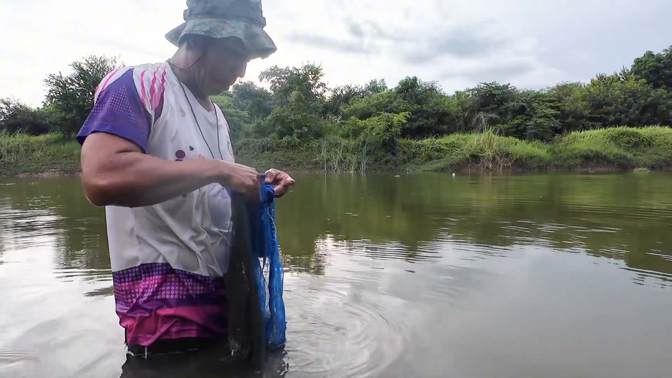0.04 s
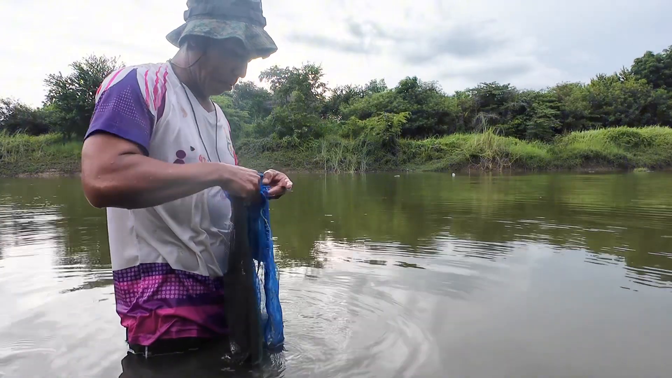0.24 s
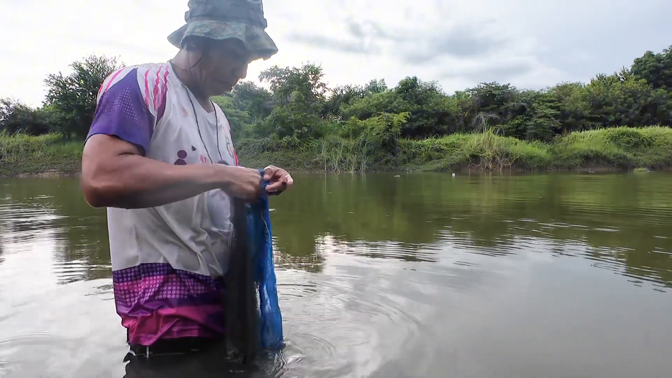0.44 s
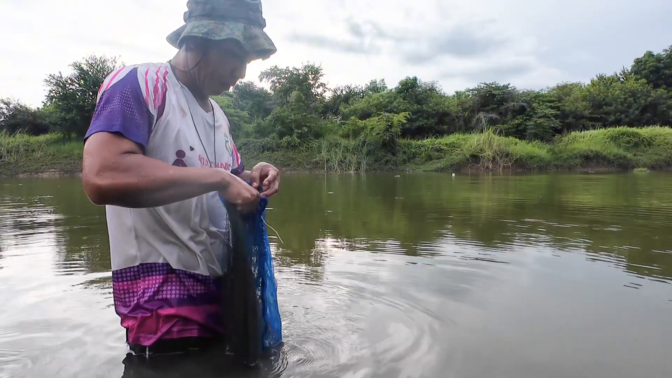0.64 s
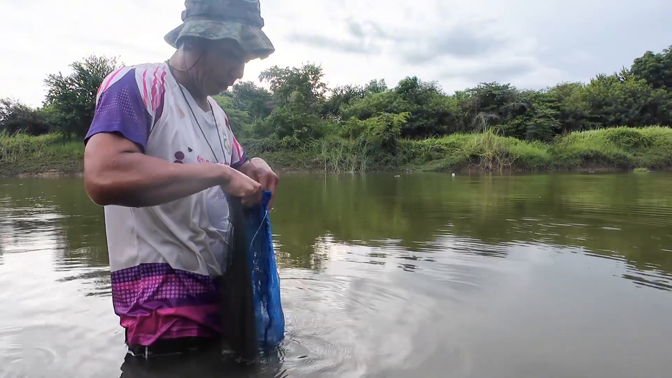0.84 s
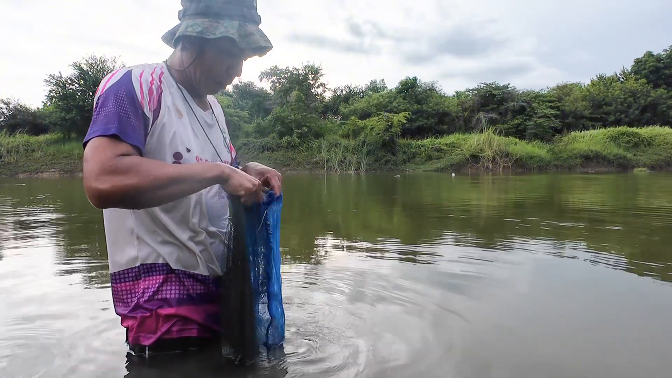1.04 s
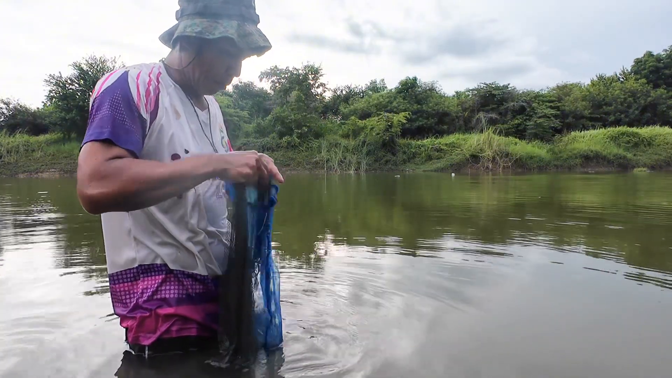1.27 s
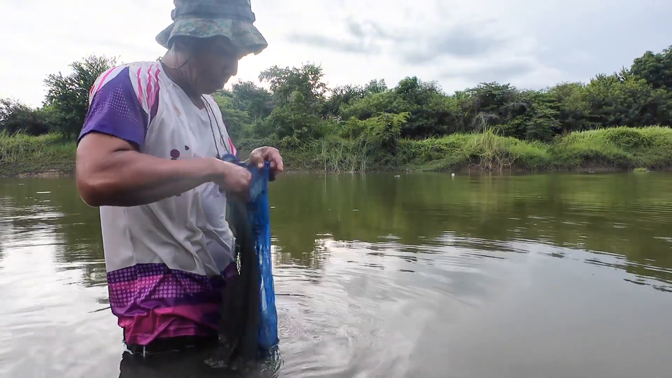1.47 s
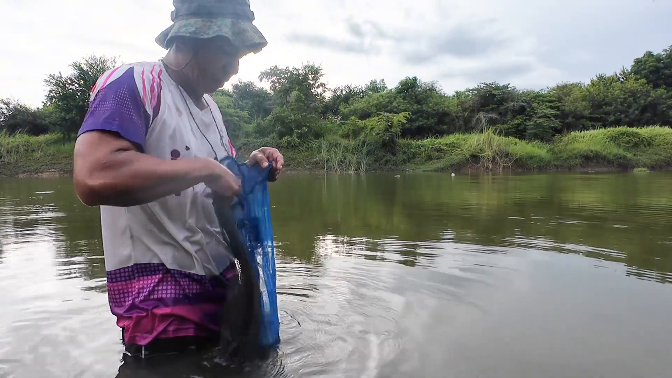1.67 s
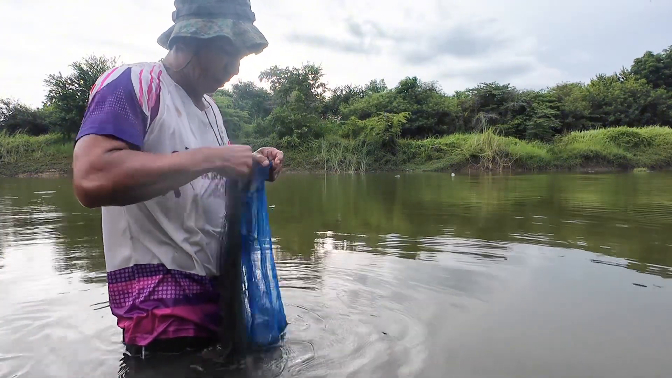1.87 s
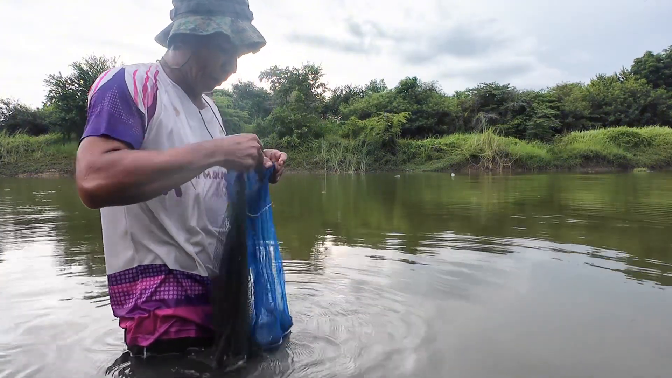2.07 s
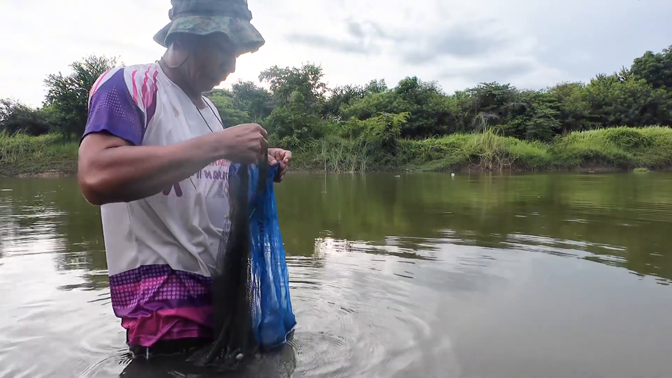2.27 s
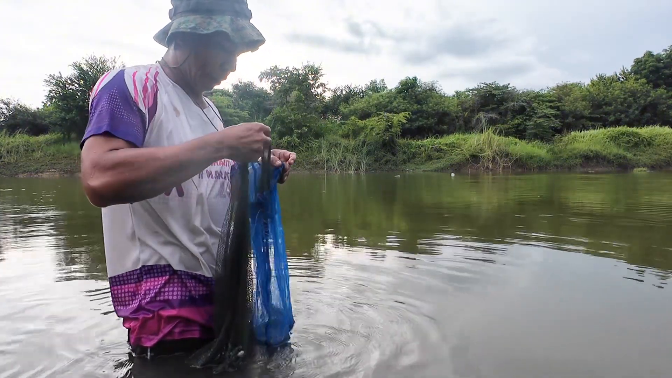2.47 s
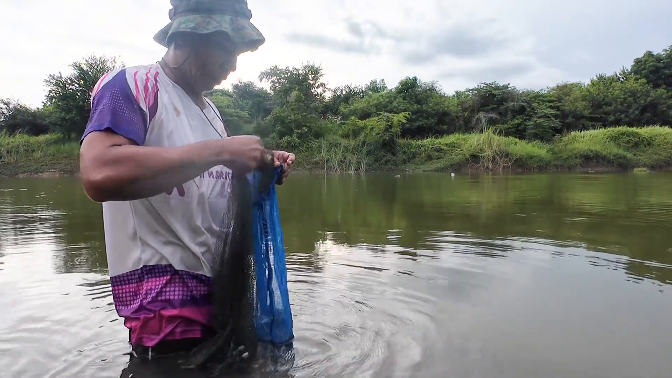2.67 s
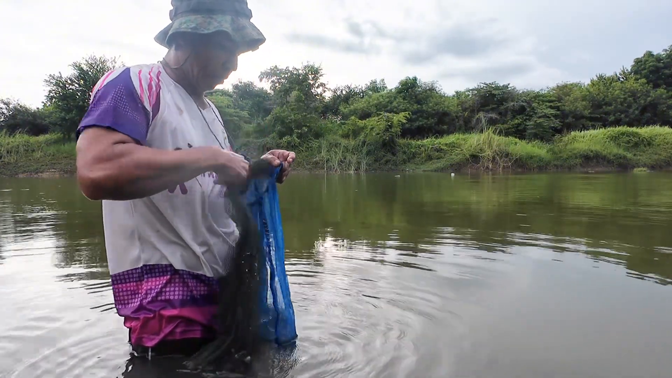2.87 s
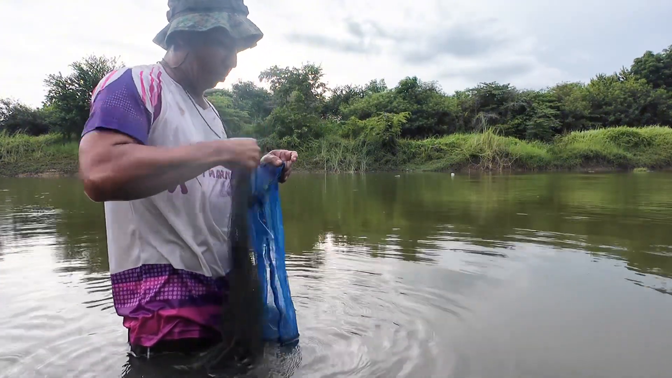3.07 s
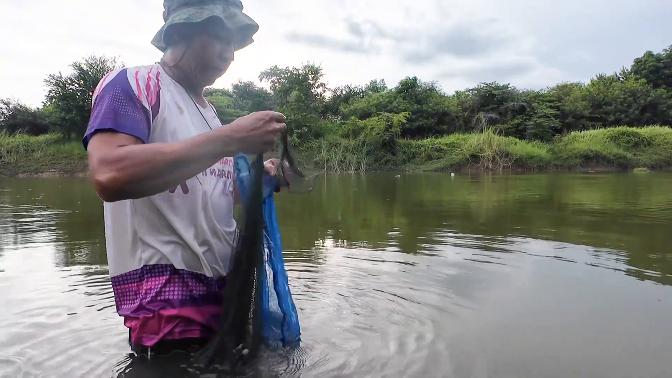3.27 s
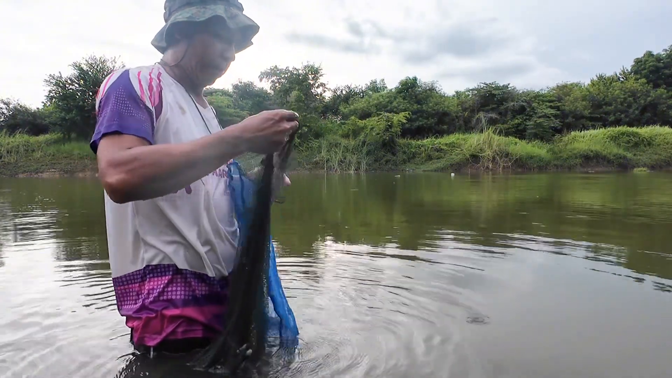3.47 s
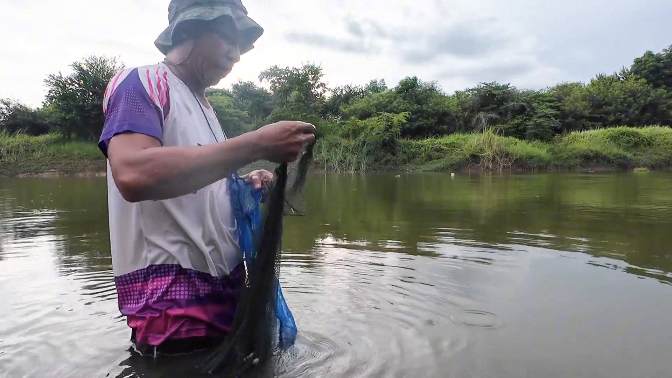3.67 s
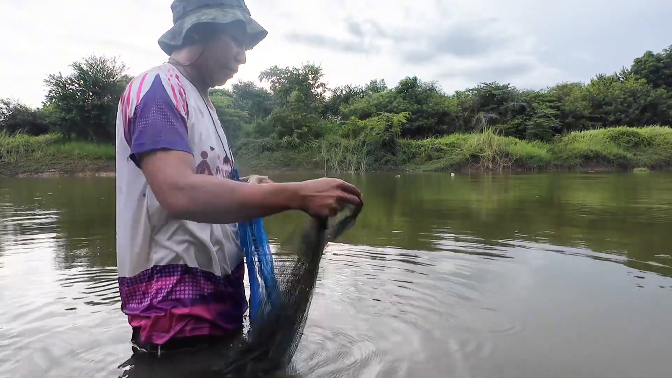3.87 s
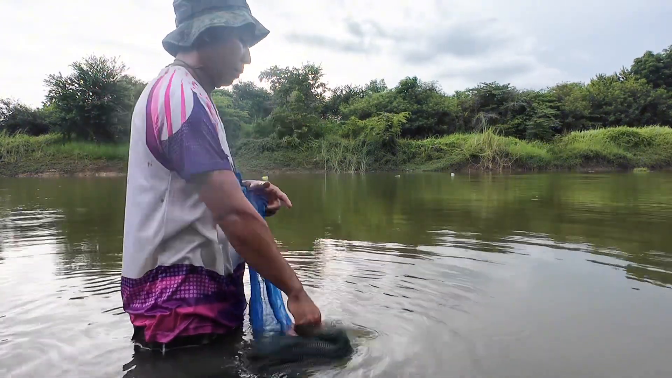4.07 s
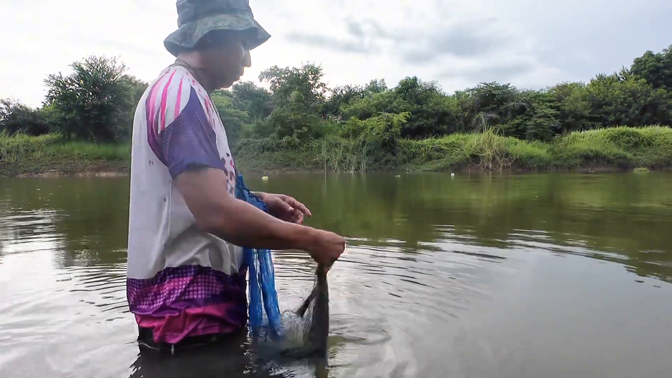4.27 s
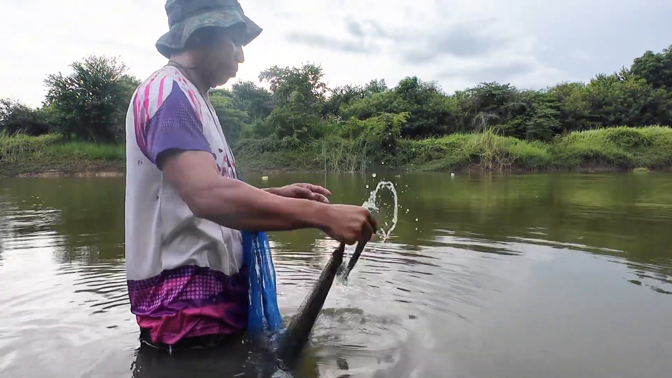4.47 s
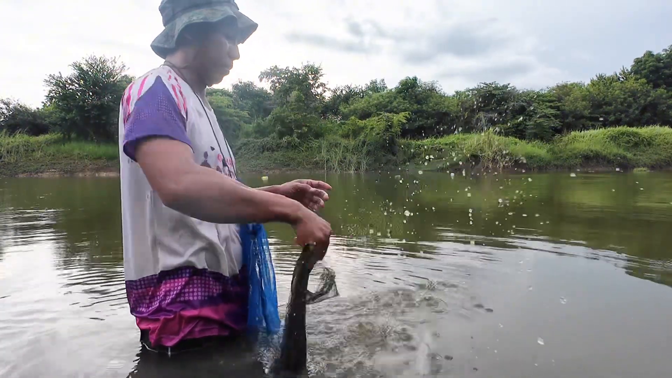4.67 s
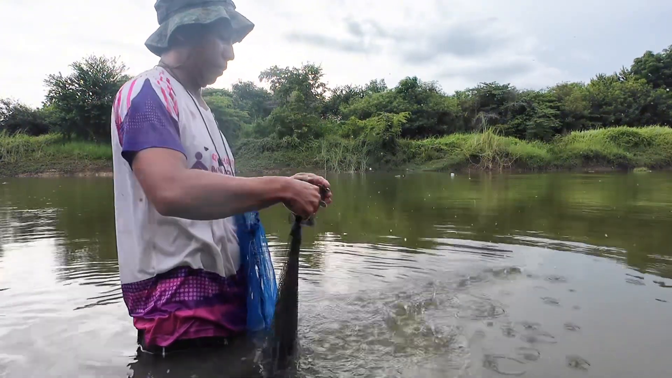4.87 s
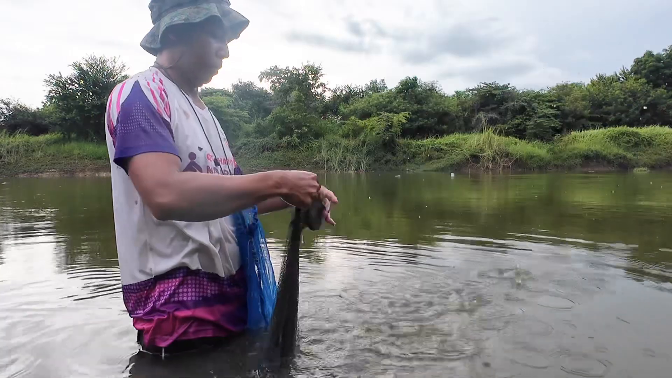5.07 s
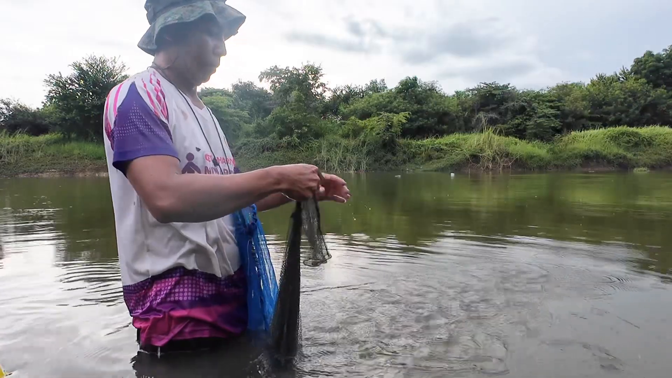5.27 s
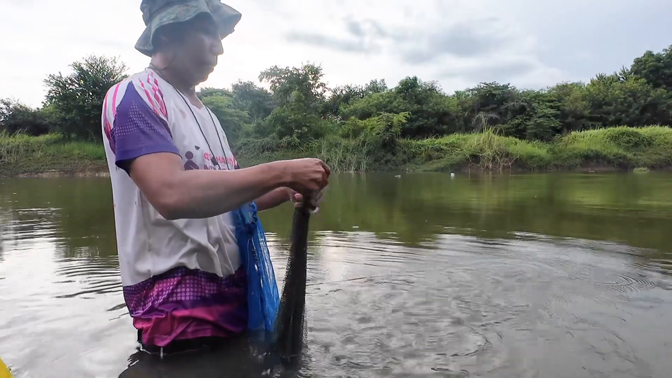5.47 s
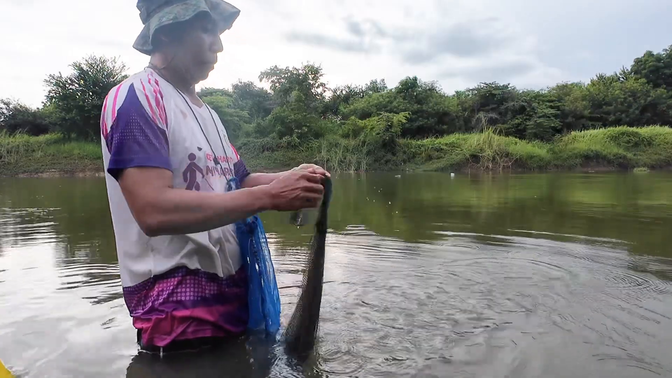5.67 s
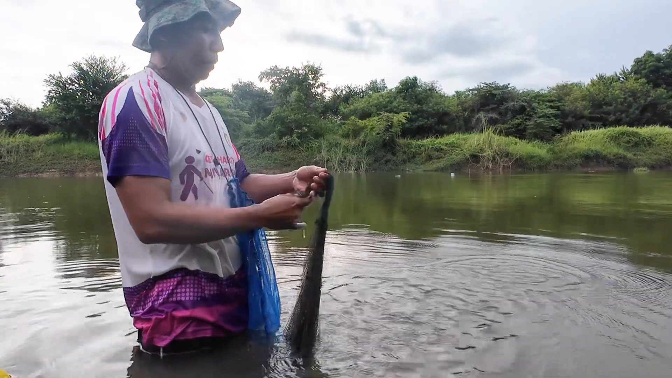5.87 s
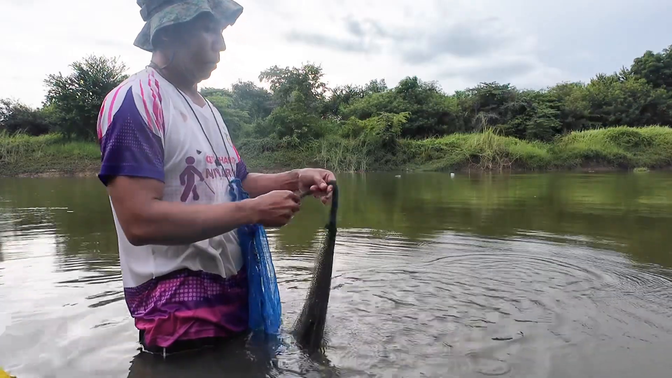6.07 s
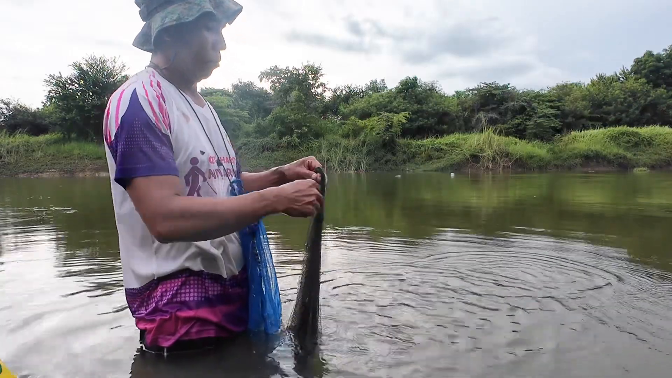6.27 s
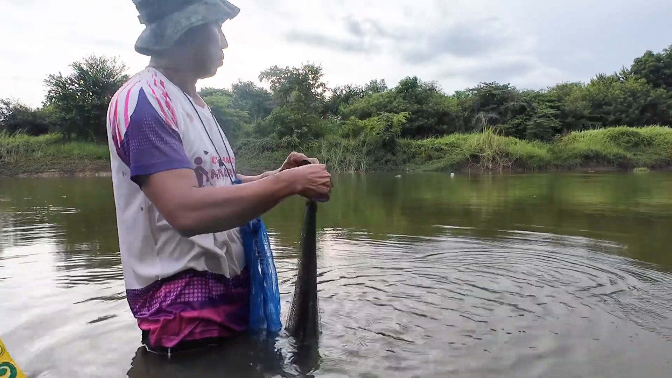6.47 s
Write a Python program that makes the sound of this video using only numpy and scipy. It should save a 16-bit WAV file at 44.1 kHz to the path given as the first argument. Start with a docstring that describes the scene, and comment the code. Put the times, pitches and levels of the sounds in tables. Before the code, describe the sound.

A wet net is handled over a calm river, close to a stereo microphone. Light drips, plinks and brief trickles fall from the start, with a small splash near 0.7 seconds and more clusters from 1.4 to 2.1 and around 3 seconds. After a short lull, the net is swished and flicked at about 4.1 seconds: bubbly splashes and bright pattering spray follow, loudest around 4.5 and lasting until 5. The drops then thin out, with one sharper plink at 5.5 and faint dripping until the end at 6.5 seconds. Underneath runs a steady low rumble, with a distant engine hum that rises slightly in pitch and recedes after 3 seconds. On the bank, a cicada buzzes thinly and a cricket chirps in four faint phrases. Birds give occasional soft whistles across the water, with low coos from about 3 seconds on.

```python
"""Wet net over a calm river

Close to a stereo microphone, a wet net sheds water: spray patters, bubbles pop and single drops
plink, most of all when the net is flicked. Insects sing on the bank, and birds whistle and coo
faintly across the water. Far off, an engine hums over a low rumble."""
import sys
import numpy as np
from scipy import signal
from scipy.fft import rfft, irfft, next_fast_len
from scipy.io import wavfile
from scipy.ndimage import uniform_filter1d, map_coordinates

SR = 44100
rng = np.random.default_rng(int(sys.argv[2]) if len(sys.argv) > 2 else 0)


def to_wav(s):
    """Save 16-bit WAV."""
    ch = np.atleast_2d(s).T  # columns
    pcm = np.round(np.clip(ch, -1, 1) * 32767)  # PCM
    wavfile.write(sys.argv[1], SR, pcm.astype(np.int16))


N = 288414

# rumble, far hiss and faint insect bands: frequency_hz, relative_db
AIR_SPECTRUM = [(30, 0), (54, 2.5), (110, -2), (165, -8), (470, -26.5), (900, -32), (1600, -36),
                (4600, -40), (5050, -34.5), (5500, -57), (6500, -29.5), (7300, -76), (13500, -51),
                (16000, -52)]
# how alike the air is left and right: frequency_hz, correlation
AIR_LIKENESS = [(60, 0.7), (120, 0.96), (950, 0.63), (3770, 0.48), (7500, 0)]
# far engine: time_s, pitch_hz, level_db
ENGINE_HUM = [(0, 87, -53), (.8, 91, -48), (1.3, 94, -55), (2, 97, -46), (2.4, 98, -53.5), (2.8, 99, -47.5),
              (3.4, 105, -58), (6.54, 110, -58)]
# whistles and coos: start_s, length_s, first_hz, last_hz, relative_db
BIRD_NOTES = [(0.002, 0.038, 4000, 4200, -62.5), (0.088, 0.097, 5000, 4300, -71.5),
              (0.24, 0.021, 3120, 2140, -62), (1.18, 0.167, 3160, 3400, -74),
              (2.087, 0.12, 4830, 4300, -67), (3.093, 0.071, 559, 576, -65.5),
              (3.129, 0.074, 822, 783, -57), (3.193, 0.036, 597, 610, -60.5), (3.738, 0.14, 890, 876, -60),
              (5.17, 0.043, 914, 827, -58.5), (5.878, 0.04, 910, 1030, -63), (5.957, 0.13, 4700, 4250, -67),
              (5.979, 0.071, 565, 552, -65), (6.354, 0.017, 3230, 2200, -61.5)]
# cicada buzz: time_s, level_db
CICADA_LEVEL = [(0, -69), (2.5, -77.5), (4, -72), (6.54, -72.5)]
# cricket phrases: start_s, end_s, final_db
CRICKET_PHRASES = [(0.527, 1.353, -64), (1.924, 2.43, -61.5), (3.221, 3.658, -61), (5.522, 6.24, -63.5)]
# droplets that trap no bubble: start_s, relative_db
DROPLET_TICKS = [(0.9327, -41), (1.3667, -29.5), (1.4008, -35.5), (1.5439, -38.5), (1.6378, -40),
                 (1.8986, -45), (3.8947, -43.5), (3.9614, -47), (4.0178, -41.5), (4.0801, -34.5),
                 (4.116, -21), (4.4714, -17.5), (4.557, -26), (4.592, -29), (4.651, -25.5), (4.6935, -34),
                 (4.7062, -32), (4.7184, -37), (4.7274, -34), (4.7381, -25), (4.7661, -37), (4.8212, -30),
                 (4.8372, -27), (4.858, -33), (4.8776, -32), (4.9258, -34.5), (4.9574, -31), (4.961, -37),
                 (5.1005, -39.5), (5.1597, -43), (5.204, -40.5), (5.2697, -36), (5.3268, -40.5),
                 (5.3438, -37.5), (5.6053, -50.5), (5.893, -50), (5.975, -48)]
# drop craters snapping shut: start_s, peak_db, first_hz
CRATER_SNAPS = [(2.901, -43.5, 4270), (4.295, -32.5, 5400), (4.687, -37, 4000), (4.701, -31.5, 4300),
                (4.879, -34, 2800), (4.9903, -28.5, 3140), (5.507, -45, 2960), (5.5177, -29, 3170),
                (5.572, -53.5, 2380), (5.579, -55, 4100), (5.633, -57, 3600), (5.695, -53.5, 2560),
                (5.791, -49.5, 4200)]
# drops that trap a bubble: start_s, level_db, pitch_hz
BUBBLE_DROPS = [(0.75, -36, 4030), (0.905, -55, 2750), (1.428, -57, 2930), (1.531, -41.5, 5660),
                (1.67, -49.5, 4260), (1.798, -52, 2900), (2.077, -45, 3430), (2.08, -58.5, 820),
                (2.119, -40, 5630), (2.76, -51, 6000), (2.97, -45.5, 5870), (2.994, -50, 2900),
                (3.085, -52, 2620), (3.107, -47, 4100), (4.148, -36.5, 1690), (4.153, -37, 1340),
                (4.167, -28, 2730), (4.167, -34.5, 1060), (4.202, -40, 1030), (4.206, -31.5, 2560),
                (4.211, -44, 674), (4.216, -33.5, 3470), (4.276, -37, 1225), (4.294, -42.5, 906),
                (4.315, -44.5, 1010), (4.342, -49, 950), (4.383, -36, 2140), (4.395, -30, 1470),
                (4.4, -24.5, 4010), (4.419, -31, 2850), (4.424, -49, 1240), (4.45, -30, 4800),
                (4.453, -31.5, 1720), (4.471, -27.5, 2730), (4.471, -18.5, 4930), (4.501, -33.5, 1337),
                (4.544, -32, 4030), (4.593, -29, 5700), (4.595, -40, 1860), (4.661, -43, 1820),
                (4.714, -45, 2850), (4.761, -43.5, 2220), (4.776, -48, 2050), (4.784, -35.5, 4080),
                (4.817, -50, 484), (4.885, -28.5, 4830), (5.1, -45, 3980), (5.517, -40, 1210)]
# hiss of fine spray: frequency_hz, relative_db
SPRAY_SPECTRUM = [(1500, -18.5), (5000, -1), (8000, -3), (11000, 10), (13000, 0), (15800, -32)]
# steady dripping between splashes: time_s, relative_spray_db, relative_bubbling_db
DRIPPING = [(0, -76.5, -84), (1.15, -83.5, -87.5), (1.5, -67.5, -78.5), (2.1, -70.5, -83), (2.35, -84, -85),
            (2.8, -81, -84), (3.25, -67, -80), (3.6, -97, -85.5), (5.1, -69, -78), (5.7, -80, -79),
            (6.54, -89, -85)]
# tugs and flicks of the net: start_s, hold_s, relative_spray_db, relative_bubbling_db, pitch_hz
NET_SPLASHES = [(0.46, 0.0093, -63.5, -77.5, 3770), (0.715, 0.078, -55, -59, 3700),
                (0.9, 0.039, -69, -75, 3850), (1.373, 0.034, -65, -71, 3470), (1.64, 0.017, -65, -74, 3900),
                (1.787, 0.019, -62.5, -69, 3390), (1.937, 0.038, -60, -64.5, 3440),
                (2.01, 0.13, -66.5, -75, 3800), (2.841, 0.11, -59.5, -61, 2570),
                (2.991, 0.11, -63.5, -65.5, 3090), (3.178, 0.029, -63, -65.5, 3120),
                (4.126, 0.013, -46.5, -55.5, 3570), (4.134, 0.089, -65.5, -56, 1940),
                (4.266, 0.083, -54, -48.5, 2330), (4.395, 0.025, -54.5, -49, 2730),
                (4.446, 0.071, -53.5, -52.5, 2850), (4.541, 0.086, -52, -51.5, 3220),
                (4.599, 0.066, -48, -56, 3470), (4.715, 0.023, -58.5, -54, 3810),
                (4.786, 0.021, -51, -49.5, 2330), (4.87, 0.024, -57, -55.5, 3840),
                (4.953, 0.04, -67, -60, 4380), (5.483, 0.076, -79, -69.5, 3200)]
# narrow dip in the treble: frequency_hz, gain_db
TREBLE_DIP = [(13300, -0.5), (14600, -25), (15000, -2)]

RISE_DB_PER_S, FALL_DB_PER_S, BUBBLE_LAG_S = 435, 383, 0.0063  # shape of a splash
SMACK_DB, SMACK_DB_PER_OCTAVE = -4.5, -13.5  # against a 1 kHz ring; smaller drops smack more softly
DRIP_HZ, TOP_HZ = 3850, 16000


def amp(db):
    return 10 ** (np.asarray(db) / 20)


def unit_rms(x):
    return x / np.sqrt(np.mean(x ** 2) + 1e-20)


def along(points, hz):
    """Read (frequency_hz, value) points on a log axis."""
    frequencies, values = np.transpose(points)
    return np.interp(np.log(hz + 1), np.log(frequencies + 1), values)


def curves(rows):
    """One value per sample for each column after the time."""
    times, *columns = np.transpose(rows)
    return [np.interp(np.arange(N) / SR, times, column) for column in columns]


def wobble(rate):
    """A smooth random curve, rate knots a second."""
    return map_coordinates(rng.standard_normal(int(N * rate / SR) + 4), [np.arange(N) * rate / SR])


def tone(hz):
    return np.sin(2 * np.pi * np.cumsum(hz) / SR)


def filtered(x, response):
    """Shape x by a gain that depends on frequency."""
    size = next_fast_len(N + 8192)
    return irfft(rfft(x, size) * response(np.fft.rfftfreq(size, 1 / SR)), size)[..., :N]


def scattered(x, t60_s=0.13):
    """Echoes off leaves and water blur a sound, differently left and right."""
    echo = rng.standard_normal((2, SR // 4)) * amp(-60 * np.arange(SR // 4) / SR / t60_s)
    return signal.fftconvolve(x[None], echo / np.linalg.norm(echo[0]), axes=1)[:, :N]


def blips(start_s, gain, hz, cycles, rise, samples):
    """Damped sines that fade 60 dB over their cycles while the pitch climbs by the share rise."""
    turns = np.arange(samples) / SR * hz[:, None]
    life = turns / np.reshape(cycles, (-1, 1))
    onset = 1 - np.exp(-(turns / np.minimum(hz[:, None] / 1150, 1.6)) ** 2)
    wave = np.sin(2 * np.pi * turns * (1 + rise * np.minimum(life, 1) / 2)) * amp(-60 * life) * onset
    wave *= (gain / np.abs(wave).max(axis=1))[:, None]
    at = np.round(start_s * SR).astype(int)[:, None] + np.arange(samples)
    return np.bincount(at.ravel(), wave.ravel(), N + SR)[:N]


def patter(count, hz, octaves, cycles, scatter_db, samples):
    """Random watery grains around the pitch curve hz; those below it are softer."""
    start_s = rng.uniform(0, (N - 1) / SR, count)
    height, length, strength = rng.standard_normal((count, 3)).T
    pitch = np.clip(hz[(start_s * SR).astype(int)] * 2 ** (octaves * np.clip(height, -2, 3)), 300, 15500)
    gain = amp(scatter_db * np.minimum(strength, 2) + 1.16 * np.minimum(height, 0))
    ring_cycles = np.minimum(cycles * np.exp(1.64 * length), 2 * samples * pitch / SR)
    return unit_rms(blips(start_s, gain, pitch, ring_cycles, rise=0.32, samples=samples))


def air():
    """Distant rumble and hiss swell gently, near the centre in the bass and wide in the treble."""
    def response(hz):
        width = np.arccos(np.clip(along(AIR_LIKENESS, hz), -1, 1)) / 2
        return amp(along(AIR_SPECTRUM, hz)) * [np.cos(width), np.sin(width)]
    mid, side = filtered(rng.standard_normal((2, N)), response)
    return amp(-52 + 0.7 * wobble(2.5)) * unit_rms(np.array([mid + side, mid - side]))


def engine():
    """A far engine hums one unsteady tone, a little to the right."""
    hz, db = curves(ENGINE_HUM)
    return amp(db + 2.5 * wobble(8)) * tone(hz + 3.5 * wobble(14)) * amp([[-1.8], [1.5]])


def birds():
    """Soft notes glide to their last pitch and waver on the way across the water."""
    song = np.zeros(N + SR)
    drift = 1 + 0.003 * wobble(40) + 0.007 * wobble(200)
    for start_s, length_s, first_hz, last_hz, db in BIRD_NOTES:
        progress = np.linspace(0, 1, round(length_s * SR))
        span = round(start_s * SR) + np.arange(len(progress))
        hz = (first_hz + (last_hz - first_hz) * progress ** 0.6) * drift[span]
        song[span] += amp(db) * np.sin(np.pi * progress) ** 0.4 * tone(hz)
    song = song[:N] * amp(2.2 * wobble(30) + 3 * wobble(150))
    return 0.6 * song + 0.25 * scattered(song)


def cicada():
    """A cicada on the bank buzzes in a narrow, fluttering band near 10 kHz."""
    band = filtered(rng.standard_normal((2, N)), lambda hz: np.exp(-((hz - 9820) / 430) ** 2))
    return unit_rms(band) * amp(curves(CICADA_LEVEL)[0] + 1.6 * wobble(15) + 2.14 * wobble(120))


def cricket(chirps_per_s=17):
    """A cricket on the bank repeats falling chirps in swelling phrases, blurred by echoes."""
    song = np.zeros(N)
    for start_s, end_s, final_db in CRICKET_PHRASES:
        t = np.arange(round((end_s - start_s) * SR)) / SR
        chirp_phase = (chirps_per_s * (t - t[-1]) + 0.09 * wobble(12)[:len(t)]) % 1
        swell = amp(final_db - 5 * (1 - t / t[-1]) + 2.8 * wobble(13)[:len(t)])
        chirps = np.sin(np.pi * chirp_phase ** 1.5) * tone(6900 - 750 * chirp_phase)
        song[round(start_s * SR):][:len(t)] += swell * chirps
    return scattered(song)


def ticks():
    """Droplets hit the surface just right of centre, each a cluster of five high blips within 3 ms."""
    start_s, db = np.transpose(DROPLET_TICKS)
    clusters = np.zeros(N)
    for band in range(5):
        delay, detune = rng.uniform(0, 1, (2, len(db)))
        gain = amp(db - 1.5 - 2.1 * (3 - band) ** 2)
        hz = 4200 + 1900 * (band + detune)
        clusters += blips(start_s + delay / 330, gain, hz, cycles=14, rise=0.047, samples=200)
    return clusters * amp([[-0.6], [0.6]])


def snaps():
    """A drop's crater snaps shut with a short rising chirp."""
    start_s, db, hz = np.transpose(CRATER_SNAPS)
    return blips(start_s, amp(db), hz, cycles=12, rise=0.7, samples=300)


def plinks():
    """Each drop smacks the surface briefly, and the bubble it traps rings on."""
    start_s, db, hz = np.transpose(BUBBLE_DROPS)
    ring = blips(start_s, amp(db), hz, cycles=36 * (hz / 1e3) ** 0.15,
                 rise=230 / hz[:, None], samples=2400)
    ring *= amp(2 * wobble(250))
    smack_gain = amp(db + SMACK_DB + SMACK_DB_PER_OCTAVE * np.log2(hz / 1e3))
    smack = np.zeros(N)
    for band_hz in (2400, 3300, 4500):
        smack_hz = band_hz * 2 ** rng.normal(0, 0.15, len(db))
        smack += blips(start_s, smack_gain, smack_hz, cycles=20, rise=0.1, samples=500)
    return ring + smack


def spray():
    """Fine spray lands as short bright grains in a hiss."""
    grains = patter(count=7000, hz=np.full(N, 9500), octaves=0.457, cycles=16.5, scatter_db=4, samples=128)
    hiss = filtered(rng.standard_normal(N), lambda hz: amp(along(SPRAY_SPECTRUM, hz)))
    return grains + 1.1 * unit_rms(hiss)


def wash(pitch):
    """Countless bubbles blur into patchy noise in a wide band that follows their pitch."""
    hz, t, spectrum = signal.stft(rng.standard_normal(N), SR, nperseg=256)
    centre_hz = pitch[np.minimum(t * SR, N - 1).astype(int)]
    octaves = np.log2((hz[:, None] + 1) / centre_hz)
    patches = uniform_filter1d(rng.standard_normal(spectrum.shape), size=2, axis=0)
    patches = uniform_filter1d(patches, size=4, axis=1)
    gain_db = 6.5 * unit_rms(patches) - np.where(octaves < 0, 15, 3.5) * octaves ** 2
    return unit_rms(signal.istft(spectrum * amp(gain_db), SR, nperseg=256)[1][:N])


def bubbles(pitch):
    """Bubbles pop in a slightly wide wash, longer and lower than the spray."""
    pops = patter(count=6000, hz=pitch, octaves=0.45, cycles=24, scatter_db=3, samples=330)
    return pops + 1.25 * wash(pitch) + amp(-15) * np.outer([1, -1], wash(pitch))


def flow():
    """Splashes rise, hold and fall over the dripping; bubbles lag, and the loudest lead the pitch."""
    start_s, hold_s, spray_db, bubble_db, hz = np.transpose(NET_SPLASHES)[:, :, None]
    def splash_power(db, t):
        before_s, after_s = np.maximum(start_s - t, 0), np.maximum(t - start_s - hold_s, 0)
        return amp(db - RISE_DB_PER_S * before_s - FALL_DB_PER_S * after_s) ** 2
    t = np.arange(N) / SR
    drip_spray, drip_bubbles = amp(curves(DRIPPING)) ** 2
    spray_power = splash_power(spray_db, t).sum(axis=0) + drip_spray
    splash_bubbles = splash_power(bubble_db, t - BUBBLE_LAG_S)
    bubble_power = splash_bubbles.sum(axis=0) + drip_bubbles
    pitch = ((splash_bubbles * hz).sum(axis=0) + drip_bubbles * DRIP_HZ) / bubble_power
    return np.sqrt(spray_power), np.sqrt(bubble_power), pitch


def net():
    """Close up, water falls from the net in clumps, raising spray and bubbles."""
    spray_gain, bubble_gain, pitch = flow()
    clumps = amp(2.8 * wobble(110))
    mid, side = spray(), amp(-7) * spray()  # spray lands all around, so left and right differ
    return (np.array([mid + side, mid - side]) * spray_gain + bubbles(pitch) * bubble_gain) * clumps


def scene():
    """The far background, the life on the bank and the water at the microphone."""
    return air() + engine() + birds() + cicada() + cricket() + ticks() + snaps() + plinks() + net()


def record(dry):
    """A narrow treble dip, then nothing above the band limit."""
    return filtered(dry, lambda hz: amp(along(TREBLE_DIP, hz)) * (hz < TOP_HZ))


dry = scene()
out = record(dry)
to_wav(out)
```